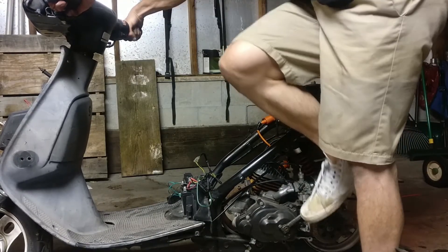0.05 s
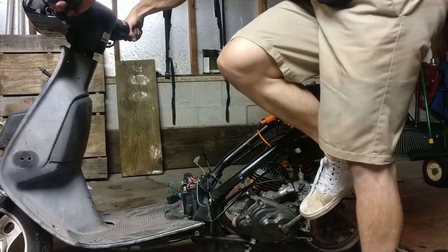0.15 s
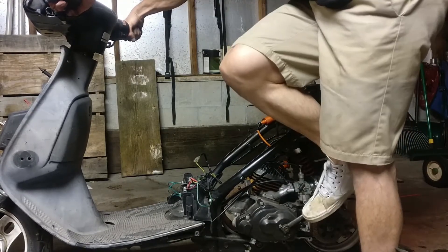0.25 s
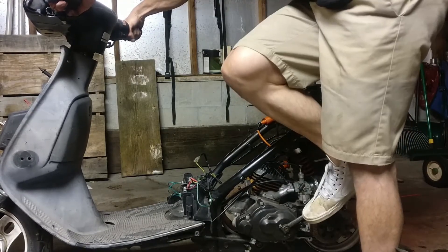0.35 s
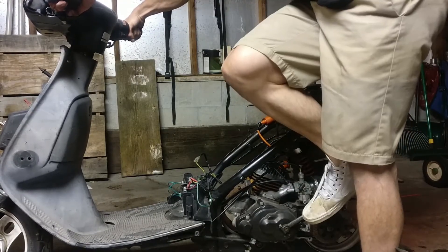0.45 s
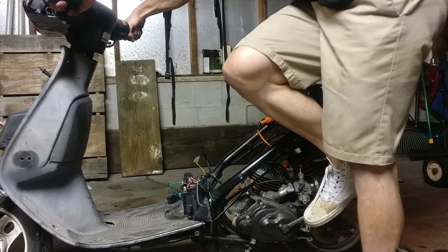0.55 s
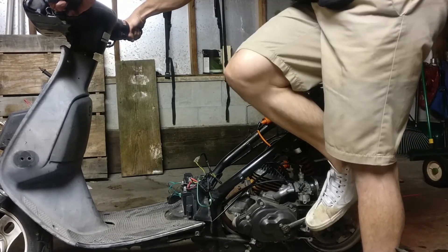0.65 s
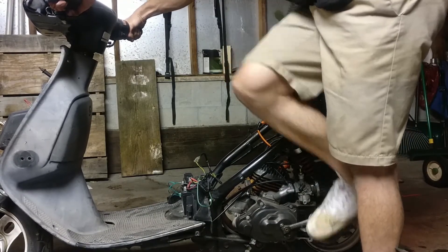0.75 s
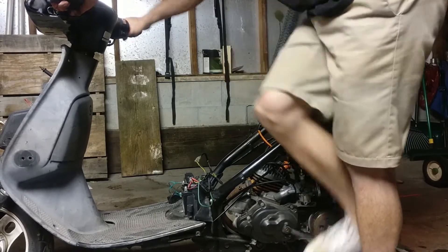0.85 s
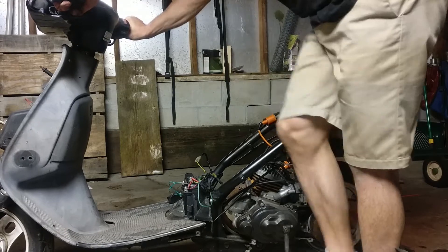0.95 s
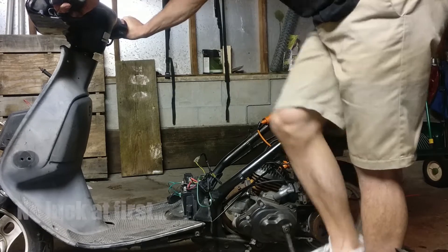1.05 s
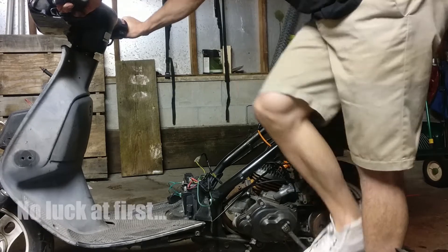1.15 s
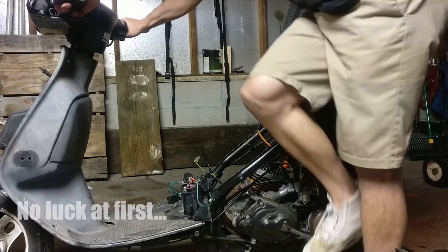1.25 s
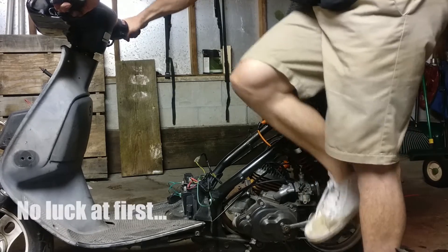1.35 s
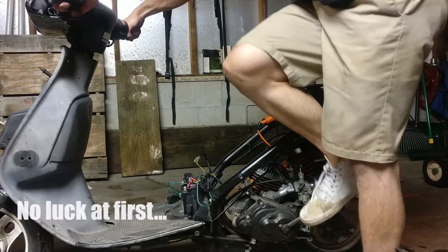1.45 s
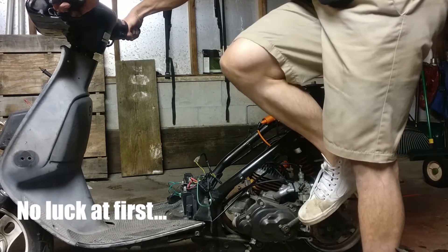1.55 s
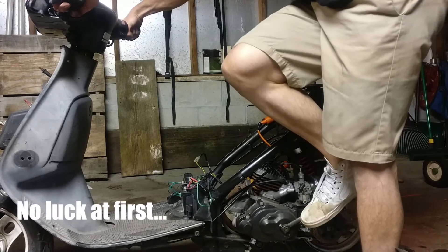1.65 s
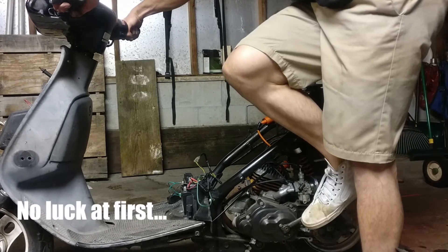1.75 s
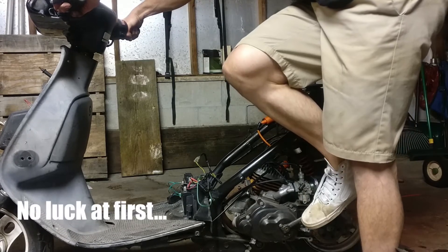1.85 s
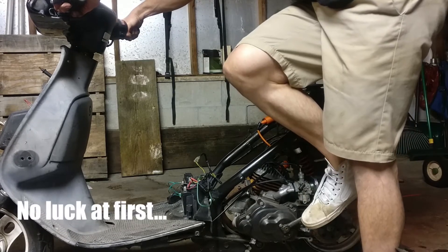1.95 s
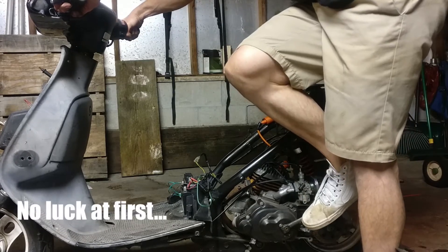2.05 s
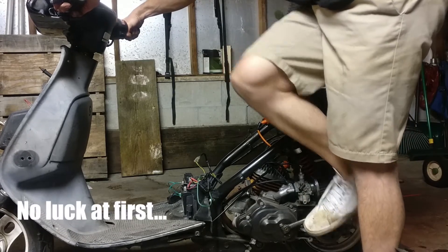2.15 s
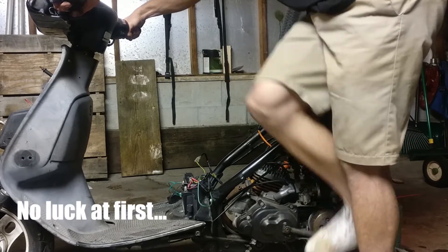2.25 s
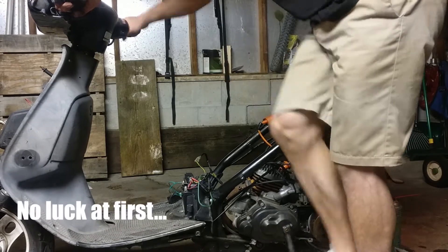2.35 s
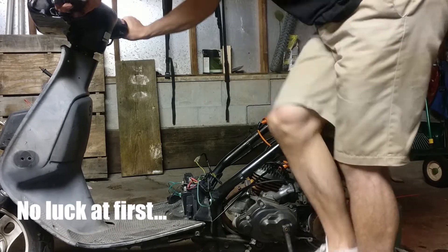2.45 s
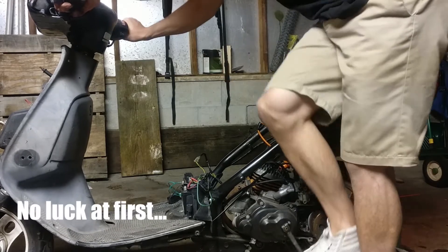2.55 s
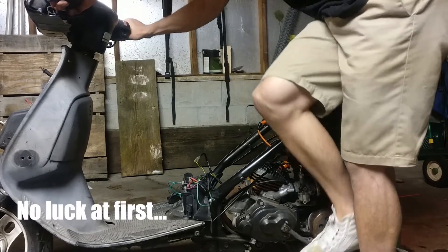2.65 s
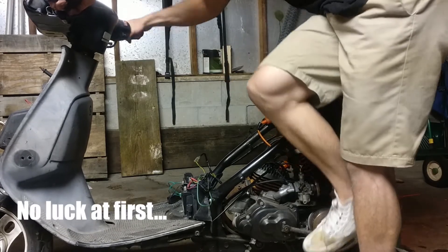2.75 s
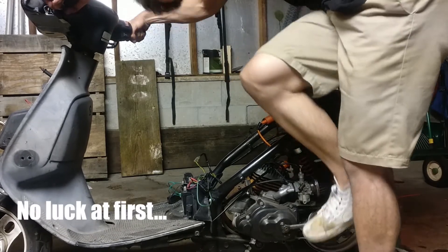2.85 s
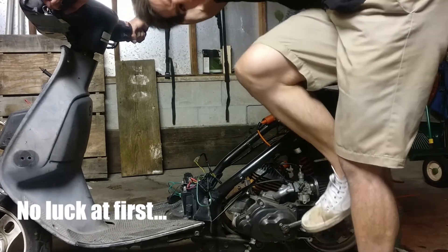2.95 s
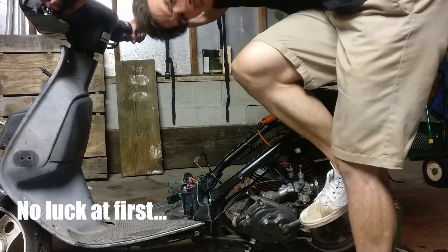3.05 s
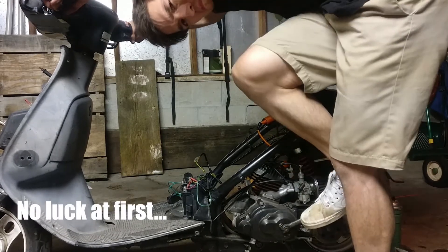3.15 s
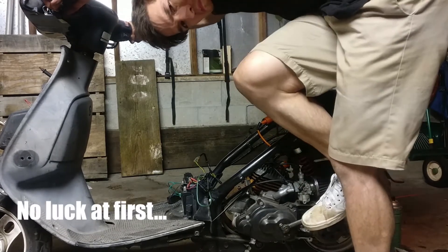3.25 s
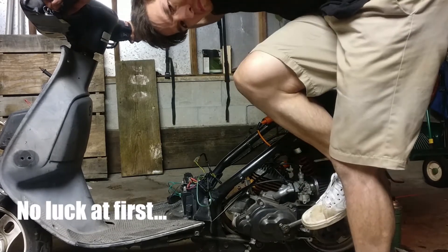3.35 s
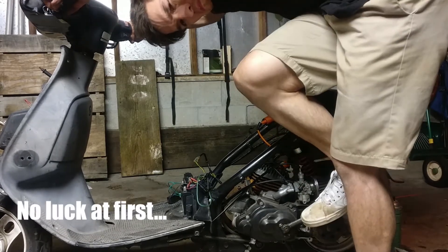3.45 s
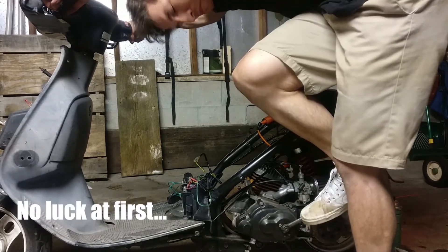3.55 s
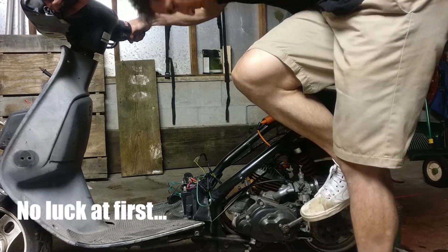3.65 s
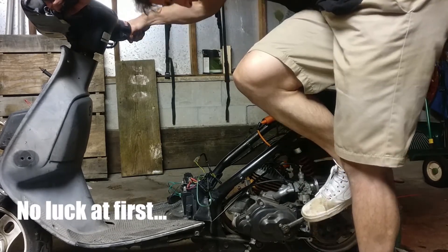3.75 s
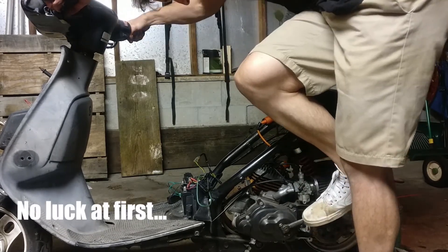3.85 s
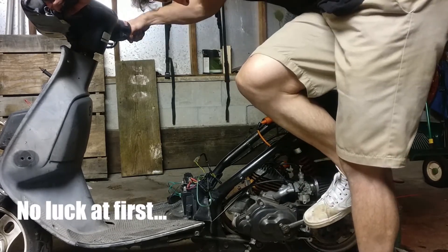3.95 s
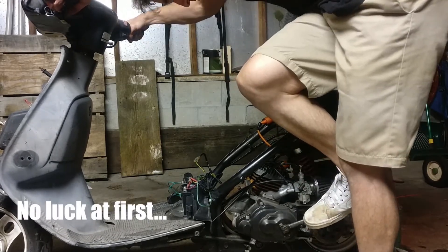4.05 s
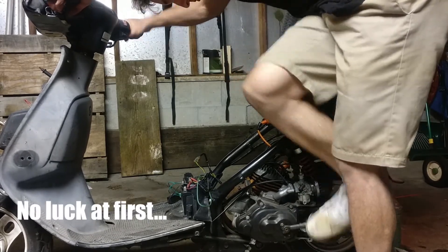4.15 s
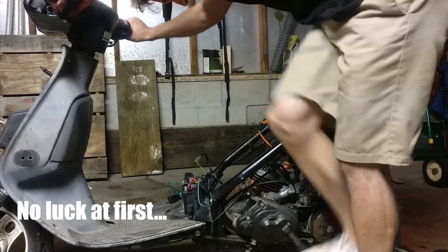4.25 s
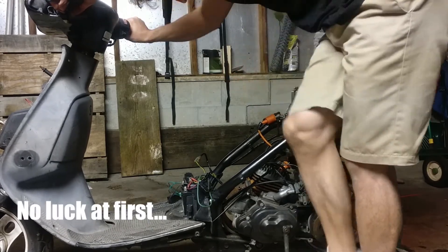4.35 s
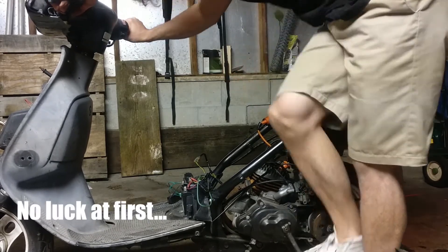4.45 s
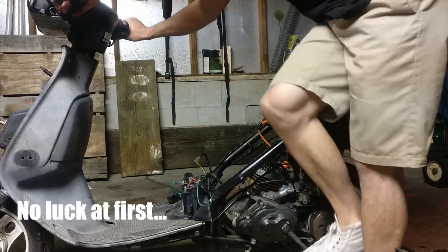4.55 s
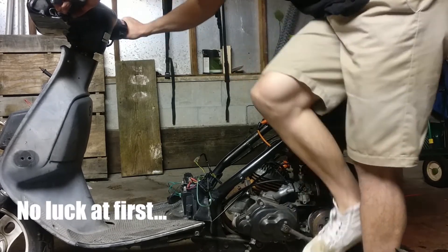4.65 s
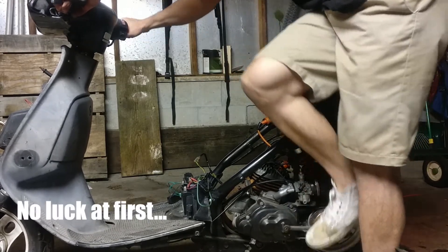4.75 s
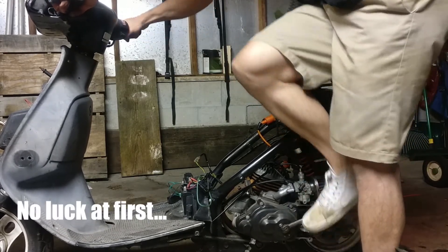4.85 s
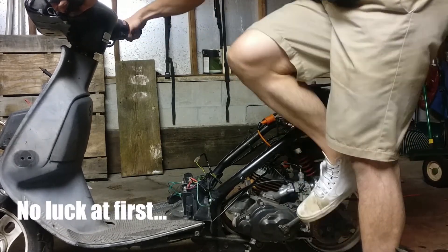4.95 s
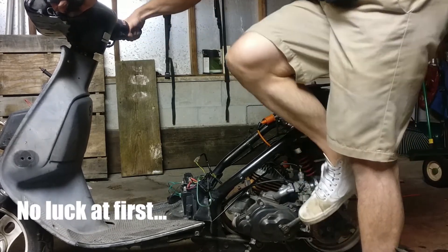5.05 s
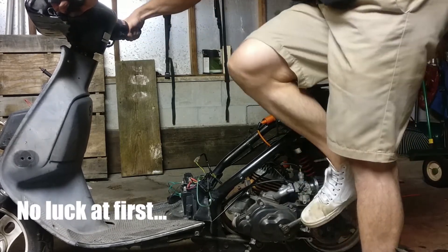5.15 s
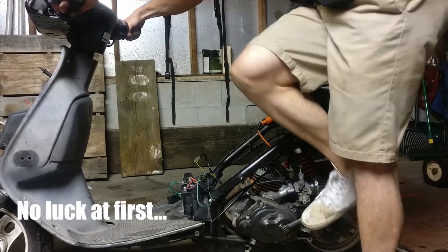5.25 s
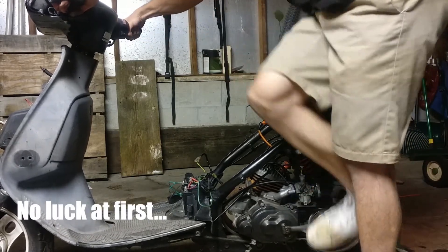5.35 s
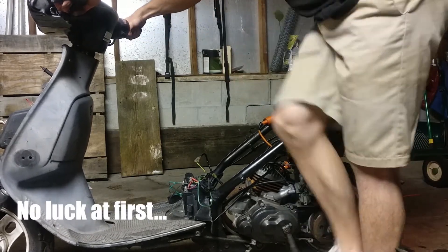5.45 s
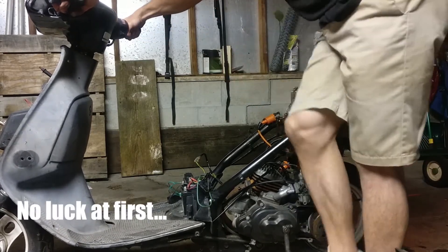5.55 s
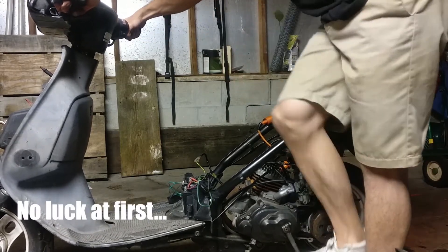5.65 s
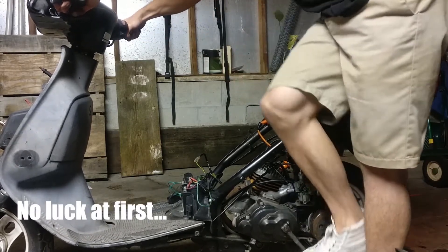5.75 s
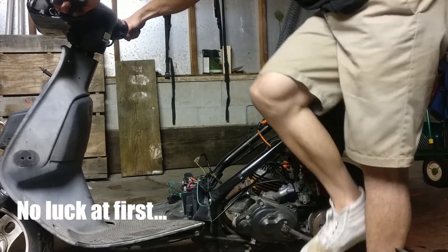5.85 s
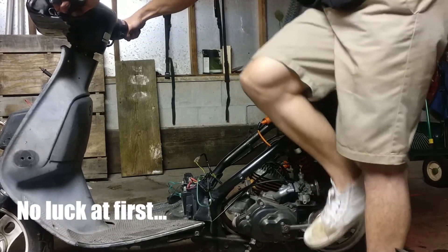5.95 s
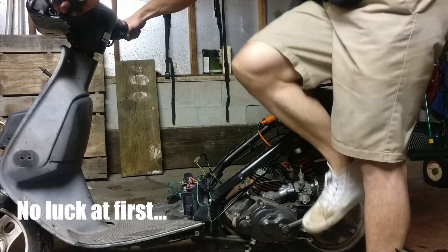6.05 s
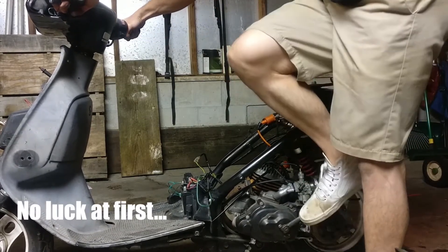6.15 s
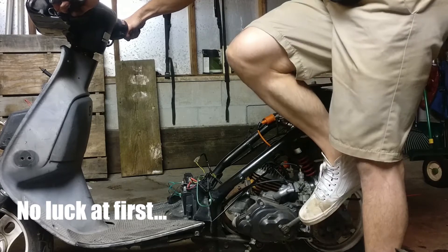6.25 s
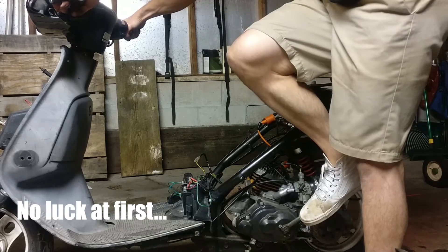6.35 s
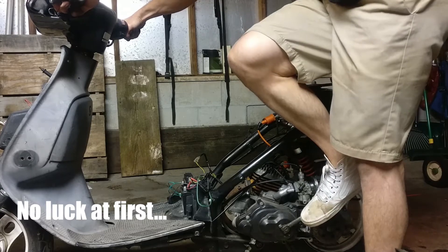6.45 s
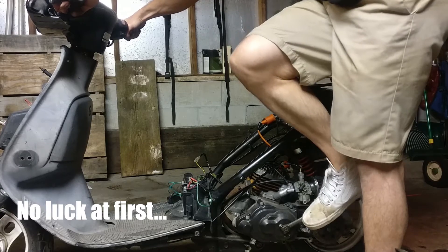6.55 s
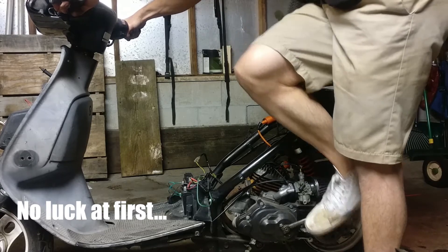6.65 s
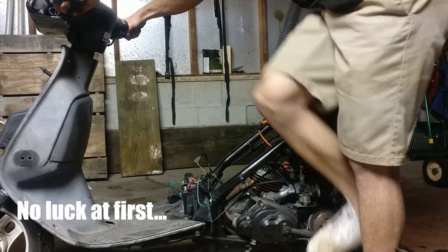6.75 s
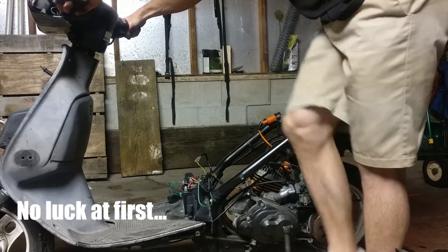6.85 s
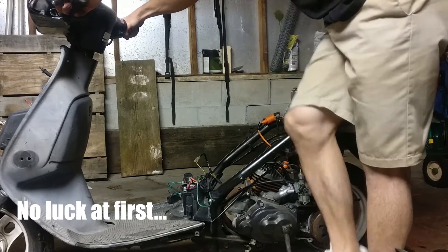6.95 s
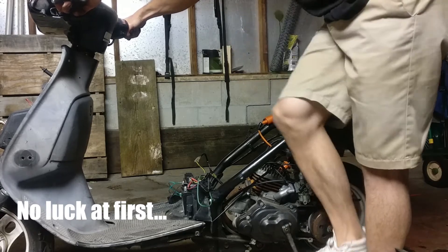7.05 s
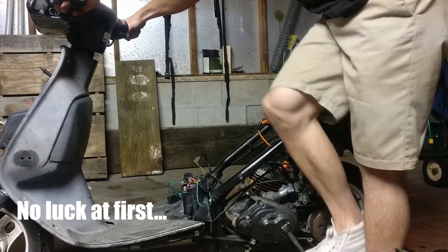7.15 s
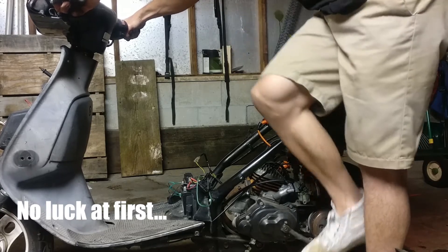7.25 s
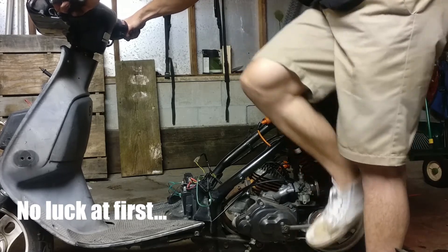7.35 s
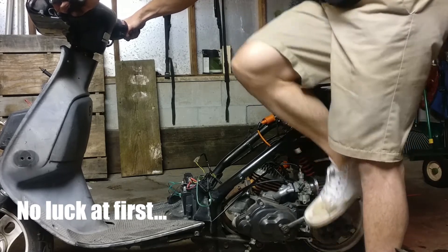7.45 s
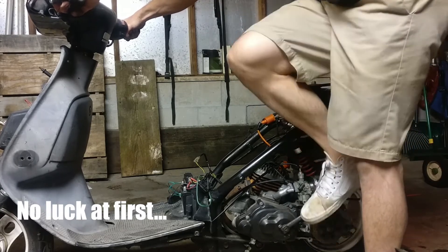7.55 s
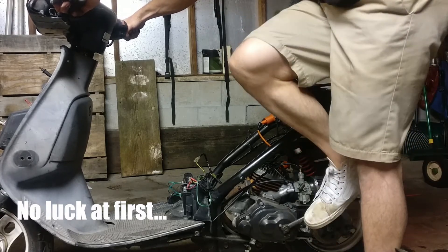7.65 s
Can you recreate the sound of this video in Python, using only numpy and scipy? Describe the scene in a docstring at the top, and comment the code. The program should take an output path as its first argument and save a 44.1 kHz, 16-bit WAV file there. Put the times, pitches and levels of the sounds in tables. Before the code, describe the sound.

Close to a stripped scooter, metal lever contacts clatter and knock the frame. Five quick kicks spin the gears in a toothy whirr with low drone, breathy intake whistle and air hiss, while the silencer booms in fading chuffs. The engine dies each time. Between kicks come return scrapes, small squeaks, shoe scuffs and loose clicks. The garage adds a brief diffuse echo; distant traffic hums softly behind, heard through a stereo phone.

```python
"""Failed kick-starts in a garage

A small scooter engine is kicked over five times and does not catch. Lever contacts are noise bursts,
ringing cover modes and frame knocks; puffs boom as damped air modes of the silencer.
Gears whirr, drone, whistle and hiss as shaped noise with ticking teeth; the lever scrapes back up
with a squeak. Filtered noise gives the distant traffic and hush. Two phone microphones listen."""
import sys
import numpy as np
from scipy import signal
from scipy.fft import rfft, irfft, next_fast_len
from scipy.io import wavfile
from scipy.ndimage import uniform_filter1d, map_coordinates

SR = 44100
rng = np.random.default_rng(int(sys.argv[2]) if len(sys.argv) > 2 else 0)


def put_to_file(sound):
    """Save the sound as 16-bit audio at rate SR, in the file named by the first command-line argument."""
    columns = np.atleast_2d(sound).T  # one column per channel
    safe = np.clip(columns, -1, 1)
    whole_steps = np.round(safe * 32767)
    wavfile.write(sys.argv[1], SR, whole_steps.astype(np.int16))


def ratio_of_db(decibels):
    """Turn decibels (scalar or array-like) into linear amplitude factors; 0 dB maps to 1."""
    return 10 ** (np.asarray(decibels, float) / 20)


N = 339129

# lever drawn back up: start_s, end_s, whirr_db, drone_db, squeak_db
RETURNS = [(1.276, 1.371, -46.5, -41.5, -38), (2.51, 2.928, -54, -46, -77), (4.69, 4.834, -49, -46.5, -50),
           (5.86, 6.003, -49, -49, -41.5), (7.243, 7.432, -48, -44.5, -38.5)]


def lever():
    """Metal contacts chatter, ring the cover briefly, crack in the treble and knock the frame."""
    # contacts of lever, ratchet and stop: time_s, level_db, treble_db and knock_db (re level)
    clacks = [(0.0617, -25, -8, -9), (0.2148, -27, -4.5, -4), (0.2341, -16.5, -39, -3.5),
              (0.6, -39.5, -47, -20), (0.6504, -19, -13.5, -13.5), (0.764, -18, -8, -1.5),
              (0.842, -20, -17, -12), (0.9669, -16, 1, -14), (1.1313, -18.5, -33, -5),
              (1.2839, -20, -20, -2), (1.3488, -25, -30, -22), (1.565, -34, -32, -13),
              (1.5786, -26.5, -7, -16), (1.5997, -19, -19, -7), (2.0857, -32, -36, -14),
              (2.1079, -11, -25, -16.5), (2.2039, -22, -27, -23), (2.2258, -22, -4.5, -23),
              (2.2829, -16, -10, 2.5), (2.3337, -15.5, -8, -6), (2.403, -18.5, -1, 0), (2.797, -41, 0, -20),
              (2.92, -43, 5, -20), (3.149, -39, -30, -20), (3.1624, -32, -5.5, -10),
              (3.2162, -36, -45, -22), (3.3958, -36, -24, -9), (3.417, -37, -2, -4),
              (3.4805, -42, -26, -14), (3.7648, -32.5, -30, -15), (3.778, -33.5, -5, -17),
              (3.8531, -25, -23, -8), (3.927, -19.5, -22, -25), (4.143, -43, -3, -20),
              (4.1825, -17.5, -11.5, -12), (4.2608, -25, -13, 6.5), (4.304, -21, -3.5, -18),
              (4.346, -14, -11, -20), (4.3714, -17.5, -3, -18), (4.7442, -27.5, -21, 2),
              (4.8262, -27.5, -23, 0.5), (5.0677, -31, -4, -24), (5.1137, -13, -26, -12.5),
              (5.1595, -18, -22, -5.5), (5.3252, -18.5, -7.5, 3.5), (5.4813, -19, -27, 6),
              (5.5628, -25, 5, -19), (5.904, -27.5, -13, 3), (6.418, -41, -0.5, -17), (6.553, -22, -23, -8),
              (6.5877, -18.5, -20, -21), (6.737, -18.5, -10.5, -7), (6.8277, -21, -11, -16),
              (6.88, -29, -17, -14), (6.9152, -16.5, 3, -26), (7.224, -22, -52, -12),
              (7.2612, -18, -37, -35), (7.3188, -14.5, -18, -4.5), (7.3597, -21.5, -17, 1.5),
              (7.5954, -27, -16, -25), (7.6042, -24, -6.5, -21), (7.6354, -12.5, -15.5, -30),
              (7.6493, -15, -17.5, -4.5)]
    # modes of lever and crankcase cover: pitch_hz, level_db, t60_s
    cover_modes = [(2400, -5, .007), (2640, 0, .009), (3100, -4, .007), (3700, -7, .006), (4300, -8, .006),
                   (4900, -9, .006), (5500, -15, .005)]
    # modes of frame and panels: pitch_hz, level_db, t60_s
    frame_modes = [(569.5, -9.5, 0.096), (700.3, -6.5, 0.083), (846, -11, 0.085), (1166, 7, 0.023),
                   (1393, 4, 0.039)]
    snap_db, wall_db, right_port_gain, onset_s = -13, -5.0, .55, .0003
    out = np.zeros((2, N))
    t = np.arange(SR // 16) / SR
    walls = garage(count=9)
    upper = np.transpose(cover_modes)[0][:, None] > 3300
    treble = signal.butter(4, 6000, "high", fs=SR, output="sos")
    broad = signal.butter(2, [1200, 6000], "band", fs=SR, output="sos")
    onset = 1 - np.exp(-t / onset_s)
    for k, (s, db, treble_db, knock_db) in enumerate(clacks):
        # a brighter contact wakes the upper cover modes more
        upper_db = 5.5 + 0.14 * treble_db + 2 * rng.standard_normal()
        cover = onset ** 2 * ring(cover_modes, t, scatter_db=2, lift_db=upper_db * upper, detune=.02)
        chatter = rng.standard_normal(len(t)) * ratio_of_db(-60 * t / .012) * onset
        crack = signal.sosfilt(treble, rng.standard_normal(len(t)) * ratio_of_db(-60 * t / 0.028))
        knock = (1 - np.exp(-t / 0.0054)) * ring(frame_modes, t, scatter_db=1.5, detune=0.021)
        rest = ratio_of_db(db + treble_db - 3.5) * crack
        rest += ratio_of_db(db + knock_db - 5.5) * knock
        rest += ratio_of_db(db + snap_db) * signal.sosfilt(broad, chatter)
        rattled_cover = unit(signal.fftconvolve(cover, chatter)[:len(t)])
        near = ratio_of_db(db - 19.5) * rattled_cover + rest
        # the body of the phone shades the right port
        add(out, s - onset_s, near * [[1], [right_port_gain]])
        # the echo is fed the smooth cover ring plus crack, knock and snap
        echo_feed = ratio_of_db(db - 26) * unit(cover) + ratio_of_db(wall_db) * rest
        add(out, s, signal.fftconvolve(echo_feed[None], walls[k % len(walls)], axes=1))
    return out


def exhaust():
    """Compressed air rushes out of the port and swells in the silencer's damped air modes."""
    # exhaust port opens: time_s, level_db, second_mode_db, upper_modes_db (sharp release: more)
    puffs = [(0.761, -21, -4, -24), (0.861, -4, 1, 0), (0.936, -7.5, 6.5, 1.5), (1.033, -11, -4, 5.5),
             (1.184, -24, -2, -4.5), (2.309, -4.5, -5, -8), (2.391, -6, 0, -2.5), (2.546, -21.5, 10.5, 7),
             (4.301, -5.5, 7, 2.5), (4.375, -8.5, 3, 4), (4.519, -18, 10, 7.5), (5.423, -2.5, -6, -13),
             (5.498, -6.5, 2, -5), (5.6, -14.5, 5, -12), (5.749, -27.5, -1, 0), (6.742, -46, 2, -14),
             (6.828, -4, -3.5, -10.5), (6.891, -5.5, -3.5, -12), (6.991, -7, -8, -10),
             (7.135, -20, -2, -15)]
    # silencer air modes: pitch_hz, level_db, t60_s
    silencer = [(89.74, 2.5, 0.18), (181.2, -5, 0.09), (245.2, -20.5, 0.46), (316.7, -24, 0.2),
                (391.5, -16, 0.089), (618, -12, 0.033)]
    # rows: left, right; columns: gain of shared echo, gain of separate echo
    room_mix = np.array([[.8, 0.33], [.8, -0.073]])
    echo_corner_hz, echo_db = 72, -4.5
    out, t = np.zeros((1, N)), np.arange(SR // 3) / SR
    hz = np.transpose(silencer)[0][:, None]
    swell = (1 - np.exp(-t * hz / 1.55)) ** 2  # each mode builds up over a few of its cycles
    swell_db = 20 * np.log10(swell + 1e-9)
    for s, db, second_db, upper_db in puffs:
        lift_db = np.where(hz > 220, upper_db, second_db) * (hz > 130)
        puff = ring(silencer, t, scatter_db=0.0, lift_db=lift_db + swell_db, detune=0.0087)
        add(out, s - .01, ratio_of_db(db - 0.63) * puff[None])
    # echo thins out below about 72 Hz
    echoing = filtered(out, lambda f: 1 / (1 + (echo_corner_hz / (f + 1)) ** 6))
    # long waves reach both microphones nearly alike
    walls = room_mix @ garage(count=1)[0]
    return out + ratio_of_db(echo_db) * signal.fftconvolve(echoing, walls, axes=1)[:, :N]


def gears():
    """Teeth rattle unevenly over a whirr, the crank drones, the intake whistles, leaking air hisses."""
    # kicks: grip_s (ratchet), stop_s (lever), push_whirr_db, freed_whirr_db, drone_db
    kicks = [(0.783, 0.965, -34, -26.5, -29), (2.16, 2.403, -33, -28.5, -32),
             (4.187, 4.364, -32.5, -30, -29), (5.324, 5.545, -31.5, -32, -34),
             (6.742, 6.914, -33, -26, -30)]
    # gulps of the intake: time_s, level_db
    gulp_rows = [(1.01, -31), (1.18, -44), (2.441, -26), (2.53, -42), (4.41, -52), (5.55, -32), (5.63, -56),
                 (6.952, -33.5), (7.37, -37.5)]
    # relative noise spectra: freq_hz, density_db
    whirr_spectrum = [(760, -44), (1300, -5.5), (1940, -15), (2520, -3.5), (3230, -5.5), (3770, -10.5),
                      (4920, -8.5), (6170, -24), (7000, -21), (9100, -47), (15400, -120)]
    drone_spectrum = [(76, 4), (130, -3.5), (183, -3), (350, -11), (399, -12.5), (471, -5.5), (606, -5.5),
                      (881, -9), (1130, -6), (1800, -9), (2340, -17.5), (3960, -120)]
    hiss_spectrum = [(3240, -32), (5500, -1), (6150, -10), (9420, -10.5), (15300, -4), (16300, -29),
                     (16800, -93)]
    whistle_spectrum = [(1000, -27.5), (1110, 3), (1145, 11.5), (1190, -3), (1300, -40)]
    grip_rise_s, freed_s = 0.0067, 0.045  # freed gears keep their speed for freed_s
    whirr_growth_db, whirr_fade_db_per_s = 10, 101.5
    drone_growth_db, drone_hold_s, drone_fade_db_per_s = 8.5, 0.096, 105
    gulp_rise_db_per_s, gulp_fade_db_per_s = 339, 294
    drone_rest_db, hiss_rest_db, whistle_db, pawl_db = -59.5, -71, -13.5, -8.5
    hiss_db, hiss_exponent = -1, 1.211  # hiss against whirr
    return_hiss_share = 0.44  # a slack lever leaks less air than a driven crank

    handling_whirr = motion(column=2)
    whirr_gain = handling_whirr.copy()
    drone_gain = motion(column=3) + ratio_of_db(drone_rest_db)
    for grip, stop, push_db, freed_db, drone_db in kicks:
        pushed = stroke(grip, stop - .04, push_db, grip_rise_s, whirr_fade_db_per_s, whirr_growth_db)
        freed = stroke(stop, stop + freed_s, freed_db, 0.0024, whirr_fade_db_per_s)
        whirr_gain += np.maximum(pushed, freed)
        drone_gain += stroke(grip, stop + drone_hold_s, drone_db, grip_rise_s,
                             drone_fade_db_per_s, drone_growth_db)
    gulps = sum(stroke(s, s + 0.0033, db, 20 / gulp_rise_db_per_s, gulp_fade_db_per_s)
                for s, db in gulp_rows)
    shake = wobble(35) + 0.41 * wobble(120)

    rattle = teeth(per_s=600, centre_hz=3300, t60=.008) * [[1], [.4]]
    whirr = whirr_gain * ratio_of_db(1.5 * shake) * (diffuse(whirr_spectrum, patchy_db=2.5) + ratio_of_db(-1.5) * rattle)
    drone = drone_gain * ratio_of_db(1.03 * shake) * diffuse(drone_spectrum, patchy_db=1.0)
    whistle_gain = (gulps + ratio_of_db(whistle_db) * drone_gain) * ratio_of_db(1.9 * wobble(28))
    whistle = whistle_gain * diffuse(whistle_spectrum)
    leak = whirr_gain - (1 - return_hiss_share) * handling_whirr
    hiss_gain = ratio_of_db(hiss_db) * leak ** hiss_exponent + ratio_of_db(hiss_rest_db)
    hiss = hiss_gain * ratio_of_db(2 * shake) * diffuse(hiss_spectrum, patchy_db=4.0)
    pawl_ticks = teeth(per_s=45, centre_hz=3400, t60=.005) * [[1], [.45]]
    pawl = ratio_of_db(pawl_db) * handling_whirr * pawl_ticks
    return pawl + whirr + drone + whistle + hiss


def teeth(per_s, centre_hz, t60):
    """Uneven tooth contacts, each a brief ring at its own pitch; rms 1."""
    when, size, pitch = rng.random((int(per_s * N / SR), 3)).T
    k = np.arange(256)
    strength = -np.log(size)[:, None]
    hz = centre_hz * 2.3 ** (pitch[:, None] - .5)
    grains = strength * ratio_of_db(-60 * k / SR / t60) * np.sin(2 * np.pi * hz * k / SR)
    places = (when * N).astype(int)[:, None] + k
    return unit(np.bincount(places.ravel(), grains.ravel(), N + 256)[:N])


def motion(column):
    """Gain of lever returns, shoe scuffs and kick four's extra drone: column 2 whirr, 3 drone."""
    # shoe scuffs, and extra low drone as the fourth kick grips: start_s, length_s, whirr_db, drone_db
    short_motions = [(0.059, 0.092, -51, -45), (0.255, 0.023, -73, -53), (0.668, 0.035, -50, -53),
                     (1.613, 0.03, -55, -52.5), (2.098, 0.018, -81, -70), (3.213, 0.058, -84, -57.5),
                     (3.856, .08, -59, -56.5), (5.124, 0.042, -75, -43), (5.352, 0.15, -76, -42),
                     (6.572, 0.039, -77, -51), (7.623, .07, -47, -45.5)]
    return_rise_s, return_fade_db_per_s = 0.065, 147
    short_rise_s, short_fade_db_per_s = 0.018, 158
    back = sum(stroke(r[0], r[1], r[column], return_rise_s, return_fade_db_per_s) for r in RETURNS)
    return back + sum(stroke(r[0], r[0] + r[1], r[column], short_rise_s, short_fade_db_per_s)
                      for r in short_motions)


def stroke(start, end, db, rise_s, fade_db_per_s, gain_db=0):
    """Gain of a motion that sets in, grows by gain_db until its end, then dies away."""
    first_db = db - gain_db
    return ratio_of_db(curves([(start - rise_s, first_db - 14.5), (start, first_db),
                       (end, db), (end + 1, db - fade_db_per_s)])[0])


def spring():
    """Thin, breathy squeak: narrow-band noise that swells with each return."""
    level = sum(stroke(start + 0.041, end - .03, db, 0.091, 190, gain_db=4.5)
                for start, end, _, _, db in RETURNS)
    squeak = diffuse([(1500, -40), (1690, -14), (1770, 0), (1850, -12), (2100, -40)])
    return level * ratio_of_db(3 * wobble(40)) * squeak


def background():
    """Far traffic booms through the walls as low noise above a steady hush."""
    # far traffic: time_s, level_db
    traffic = [(0, -40.5), (.6, -46.5), (1.5, -45), (2.1, -45.5), (2.8, -44), (3.3, -45), (3.7, -41),
               (4.7, -40), (5.2, -40.5), (6.2, -41.5), (6.7, -41), (7.3, -41), (7.7, -44.5)]
    # relative spectrum of the traffic: freq_hz, density_db
    rumble_spectrum = [(18, -73), (30, -68), (50, -22), (70, 5.5), (118, -4.5), (144, -17), (177, -24),
                       (206, -25.5), (300, -26.5), (390, -67), (660, -120)]
    # relative spectrum of still garage and microphone noise: freq_hz, density_db
    air_spectrum = [(88, -5.5), (150, -1), (183, 0), (251, -13), (288, -33), (358, -21), (923, -8),
                    (1430, -15), (5150, -28), (5570, -73), (7350, -48), (15300, -32), (16800, -59)]
    air_db = -54.5
    rumble = ratio_of_db(curves(traffic)[0] + 0.32 * wobble(5.2)) * diffuse(rumble_spectrum)
    return rumble + ratio_of_db(air_db) * diffuse(air_spectrum, patchy_db=2.5)


def ring(modes, t, scatter_db, lift_db=0, detune=0.018):
    """Damped modes at new strengths and slightly new pitch; lift_db raises each mode."""
    hz, db, t60 = np.transpose(modes)[:, :, None]
    level = db + scatter_db * rng.standard_normal(hz.shape) + lift_db
    pitch = hz * (1 + detune * rng.standard_normal(hz.shape))
    return np.sum(ratio_of_db(level - 60 * t / t60) * np.sin(2 * np.pi * pitch * t), axis=0)


def garage(count):
    """Diffuse wall echoes as decaying noise: count stereo pairs, energy 1 per channel."""
    # decay: freq_hz, t60_s
    decay = [(100, 0.59), (700, 0.63), (2000, 0.44), (5000, 0.44), (13000, 0.14)]
    noise = rng.standard_normal((count, 2, SR * 2 // 5))
    hz, t, z = signal.stft(noise, SR, nperseg=256)
    tails = signal.istft(z * ratio_of_db(-60 * t / along(decay, hz)[:, None]), SR, nperseg=256)[1]
    tails = tails / np.linalg.norm(tails, axis=2, keepdims=True)
    return np.pad(tails, [(0, 0), (0, 0), (200, 0)])  # walls answer 200 samples late


def diffuse(spectrum, patchy_db=0):
    """Stereo noise of rms 1 with patches of random gain in time and frequency."""
    # left-right likeness: freq_hz, correlation
    alike = [(60, 1), (180, 0.95), (350, 0.96), (700, 0.78), (2000, 0.073), (12000, 0.24)]
    pair = rng.standard_normal((2, N))
    if patchy_db:
        z = signal.stft(pair, nperseg=256)[2]
        field = uniform_filter1d(rng.standard_normal(z.shape[1:]), size=3, axis=0)
        field = uniform_filter1d(field, size=5, axis=1)
        pair = signal.istft(z * ratio_of_db(patchy_db * unit(field)), nperseg=256)[1][:, :N]

    def mid_side(hz):
        angle = np.arccos(np.clip(along(alike, hz), -1, 1)) / 2
        return ratio_of_db(along(spectrum, hz)) * [np.cos(angle), np.sin(angle)]

    mid, side = filtered(pair, mid_side)
    return unit(np.array([mid + side, mid - side]))


def wobble(rate):
    """A smooth random curve, rate knots a second."""
    knots = rng.standard_normal(int(N * rate / SR) + 4)
    return map_coordinates(knots, [np.arange(N) * rate / SR])


def curves(rows):
    """One value per sample for each column after the time; -200 outside the rows."""
    s, *cols = np.transpose(rows)
    return [np.interp(np.arange(N) / SR, s, c, left=-200, right=-200) for c in cols]


def along(points, hz):
    """Interpolates (Hz, value) points on a log axis."""
    f, v = np.transpose(points)
    return np.interp(np.log(hz + 1), np.log(f + 1), v)


def filtered(x, response):
    """x times a complex response of frequency."""
    m = next_fast_len(N + 8192)
    return irfft(rfft(x, m) * response(np.fft.rfftfreq(m, 1 / SR)), m)[..., :N]


def unit(x):
    """Scaled to rms 1."""
    return x / np.sqrt(np.mean(x ** 2) + 1e-20)


def add(out, s, sound):
    """Mixes sound in from s seconds on."""
    part = out[:, round(s * SR):][:, :sound.shape[1]]
    part += sound[:, :part.shape[1]]


def scene():
    """All sources summed in stereo."""
    return lever() + exhaust() + gears() + spring() + background()


def direct(x):
    """The sound reaches the left microphone a little earlier: the right channel is delayed."""
    lead_s = 12 / SR
    return filtered(x, lambda hz: np.exp(-2j * np.pi * hz * lead_s * np.array([[0], [1]])))


def microphones(x):
    """Two ports of unlike colour; both lose the deep bass and the top."""
    # left over right port: freq_hz, ratio_db
    ports = [(60, 1), (100, -1.5), (180, -2.5), (310, -1.5), (550, -5.5), (950, -2.5), (1650, -0.5),
             (2860, 4), (4970, 4), (8640, 11), (15000, 10)]
    bass_hz, top_hz = 52, 16000

    def response(hz):
        colour = ratio_of_db(along(ports, hz) * np.array([[.5], [-.5]]))
        return colour / (1 + (bass_hz / (hz + 1)) ** 12) / (1 + (hz / top_hz) ** 60)

    return filtered(x, response)


def band_limit(x):
    """A steep low-pass at the top of the band."""
    return signal.sosfilt(signal.butter(12, 16990, fs=SR, output="sos"), x)


def record(dry):
    """The sound as the phone's two microphones take it down."""
    mix = microphones(direct(dry))
    return band_limit(mix)


dry = scene()
out = record(dry)
put_to_file(out)
```